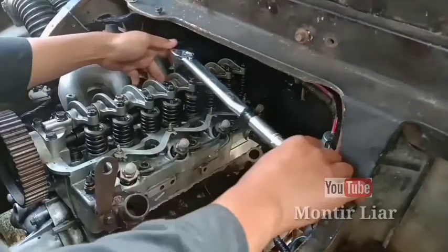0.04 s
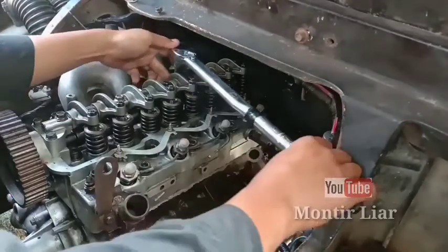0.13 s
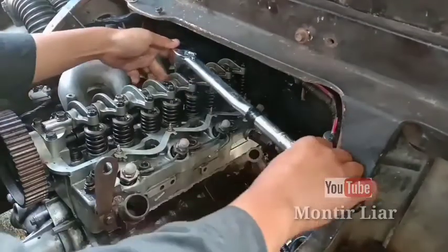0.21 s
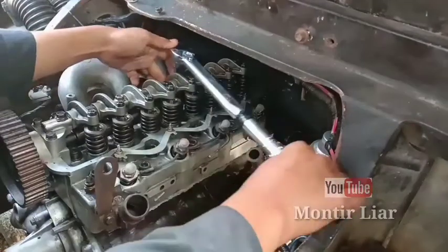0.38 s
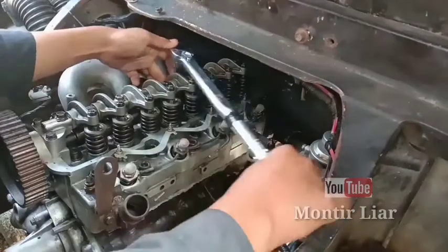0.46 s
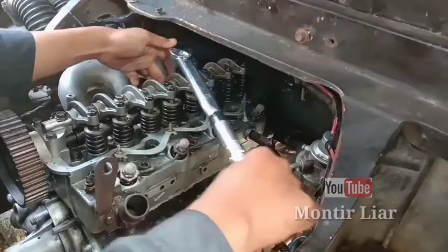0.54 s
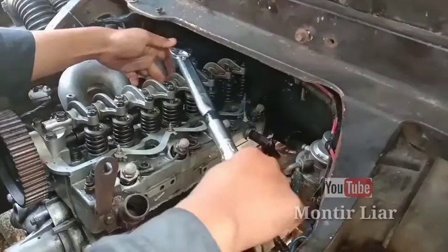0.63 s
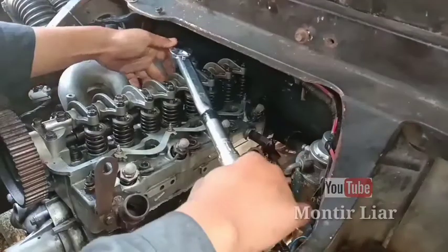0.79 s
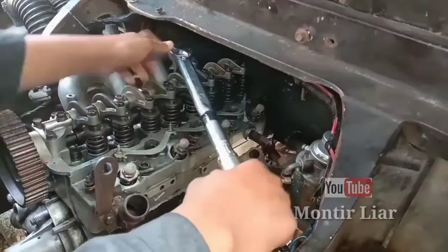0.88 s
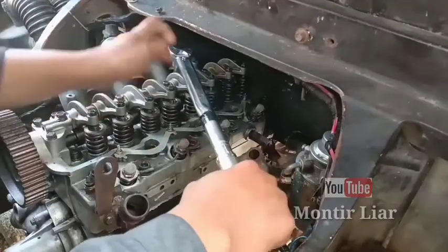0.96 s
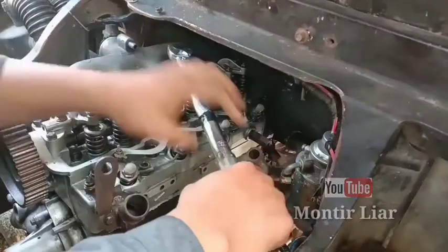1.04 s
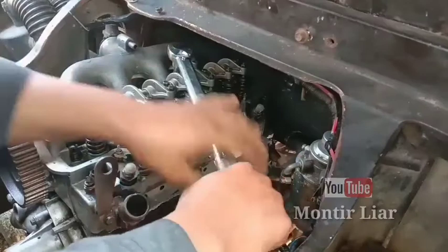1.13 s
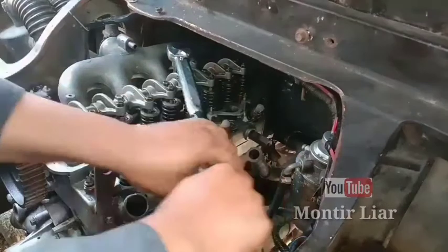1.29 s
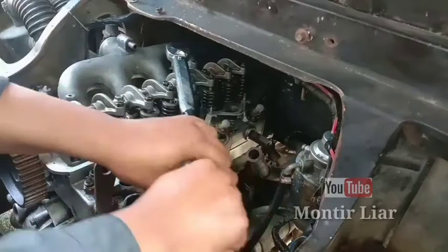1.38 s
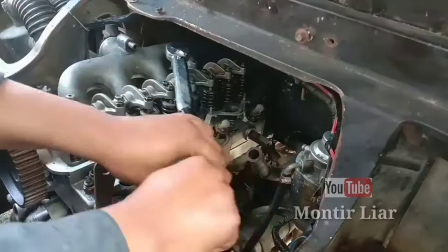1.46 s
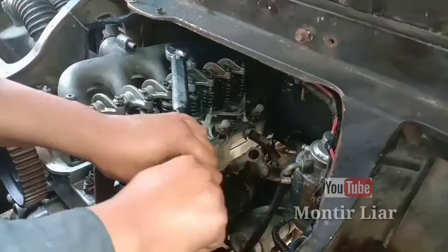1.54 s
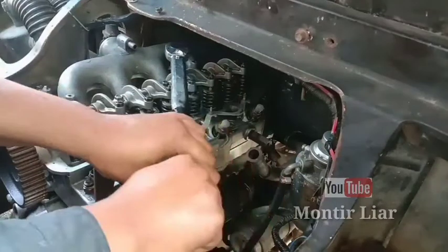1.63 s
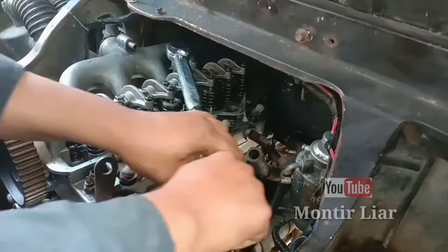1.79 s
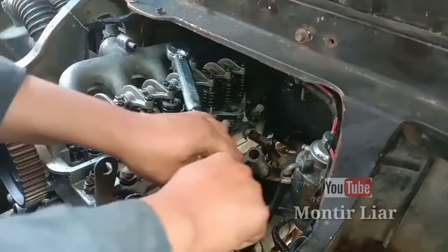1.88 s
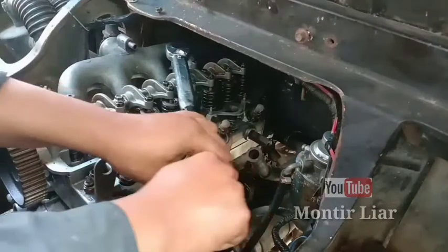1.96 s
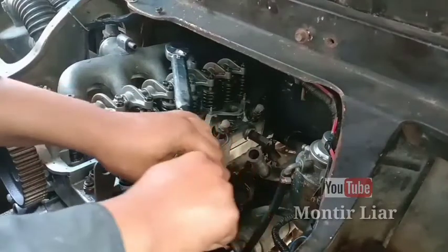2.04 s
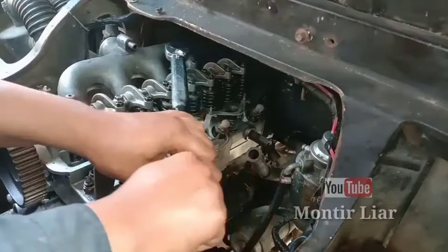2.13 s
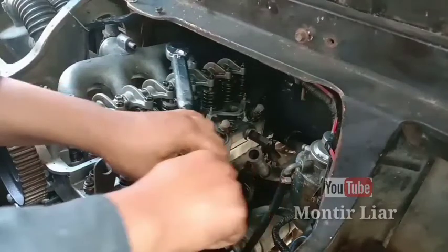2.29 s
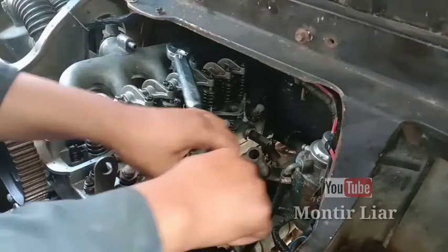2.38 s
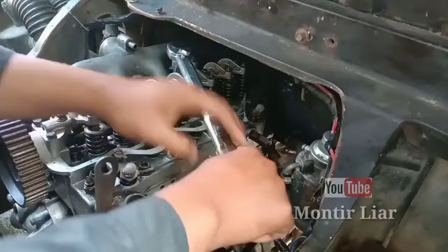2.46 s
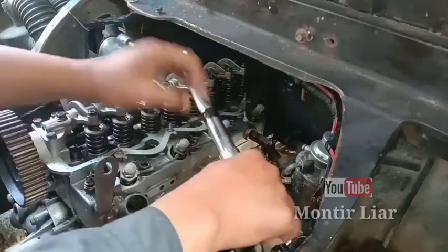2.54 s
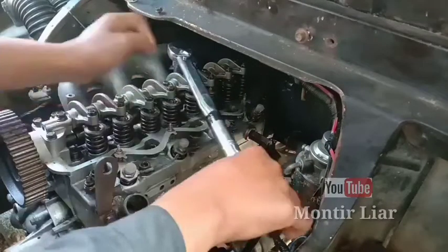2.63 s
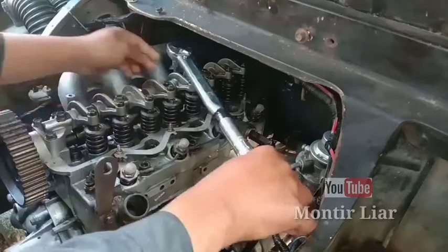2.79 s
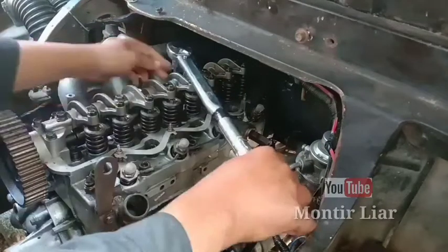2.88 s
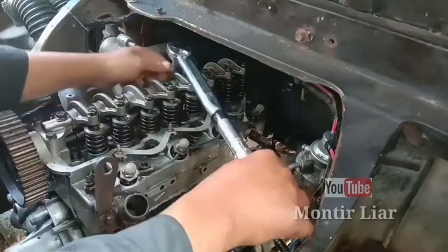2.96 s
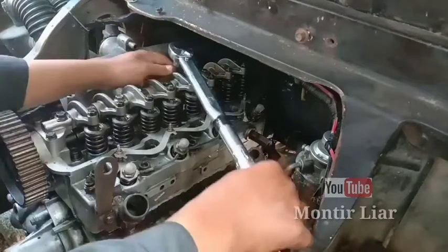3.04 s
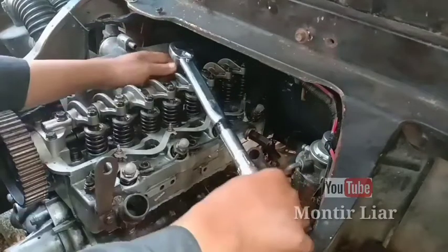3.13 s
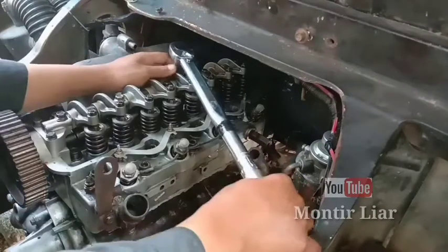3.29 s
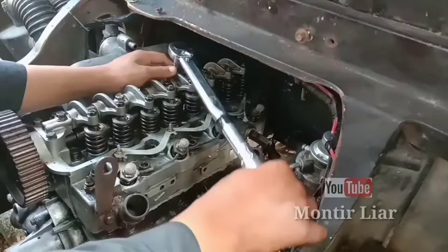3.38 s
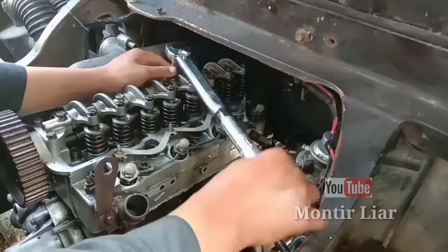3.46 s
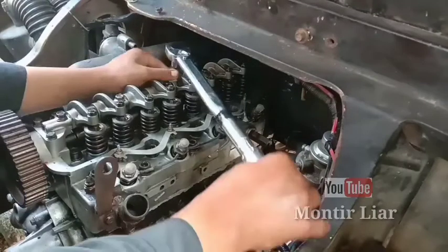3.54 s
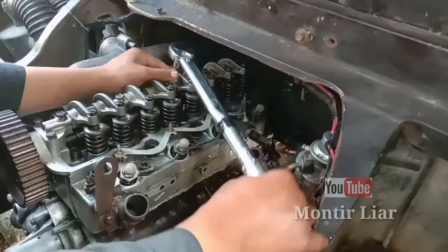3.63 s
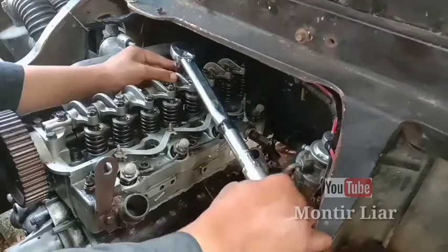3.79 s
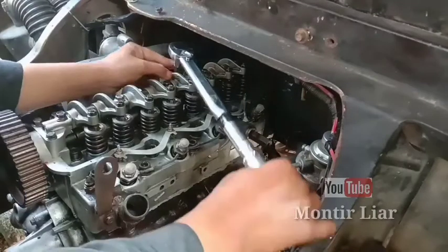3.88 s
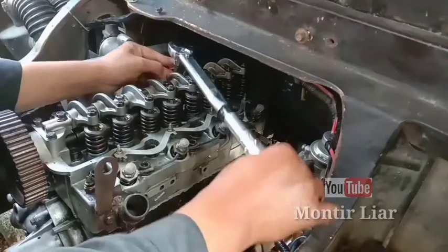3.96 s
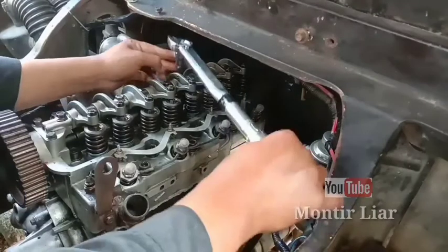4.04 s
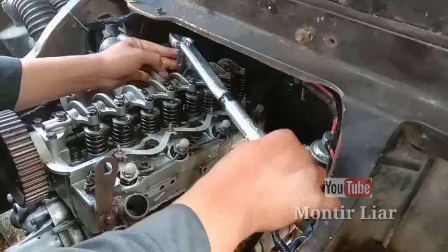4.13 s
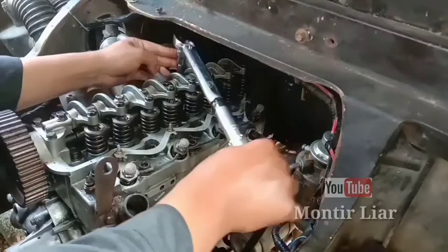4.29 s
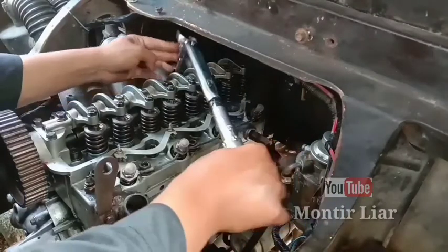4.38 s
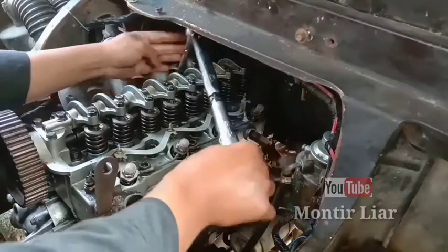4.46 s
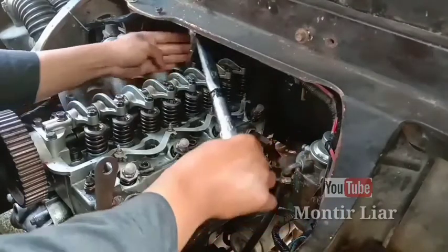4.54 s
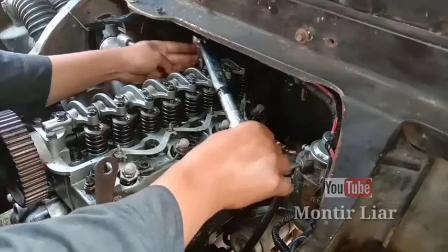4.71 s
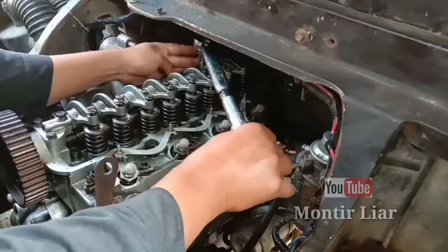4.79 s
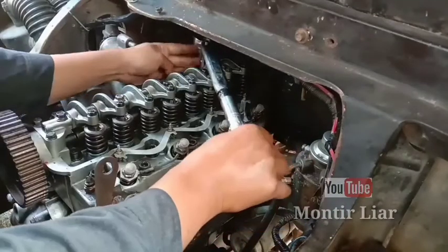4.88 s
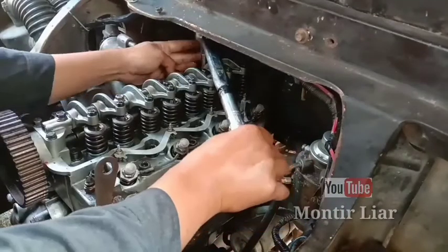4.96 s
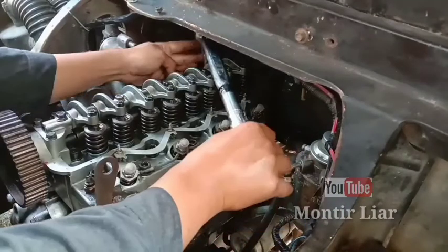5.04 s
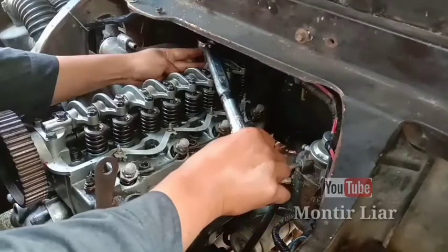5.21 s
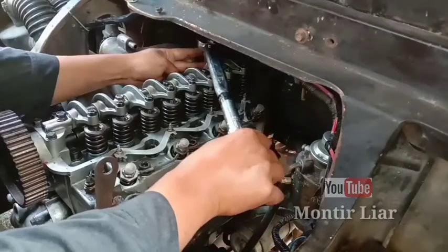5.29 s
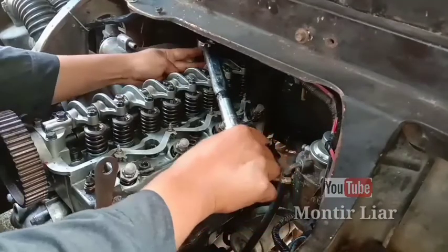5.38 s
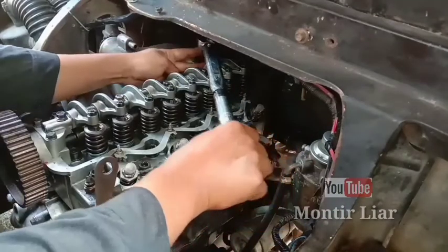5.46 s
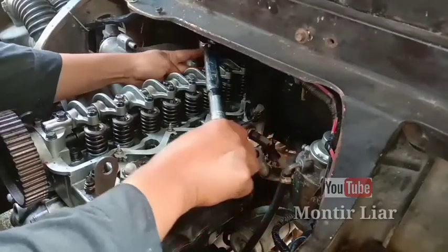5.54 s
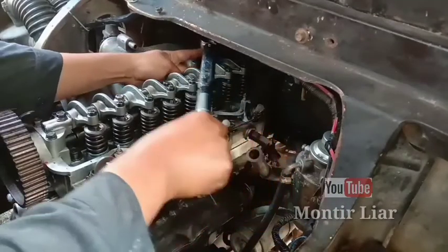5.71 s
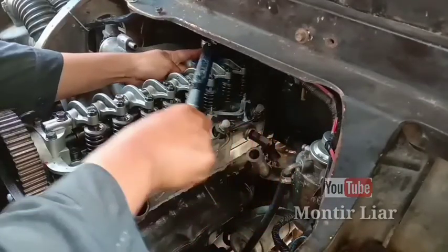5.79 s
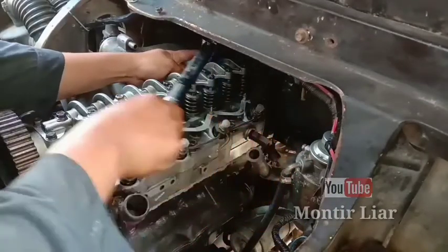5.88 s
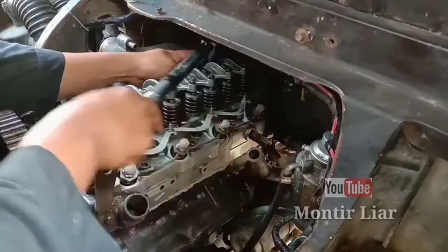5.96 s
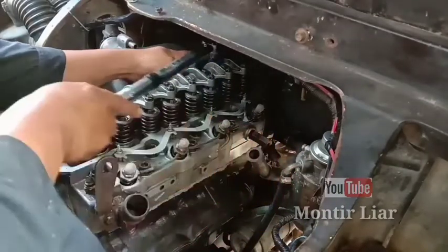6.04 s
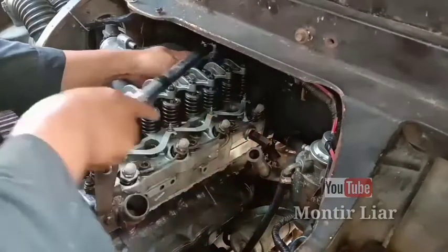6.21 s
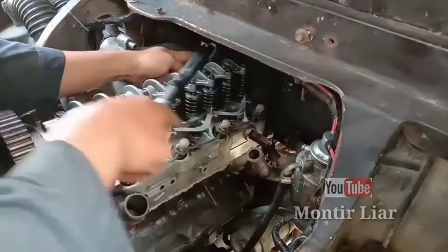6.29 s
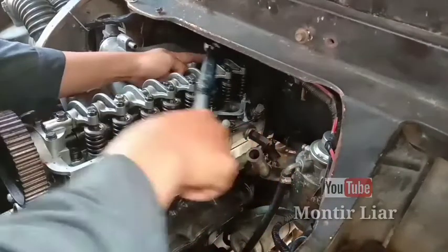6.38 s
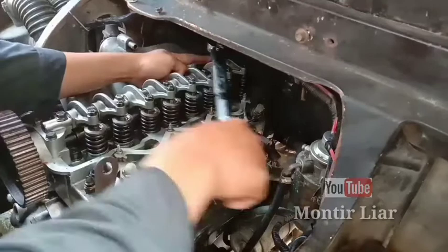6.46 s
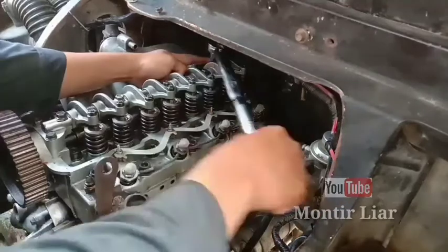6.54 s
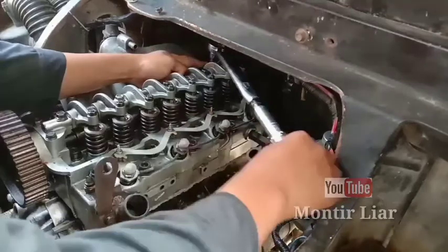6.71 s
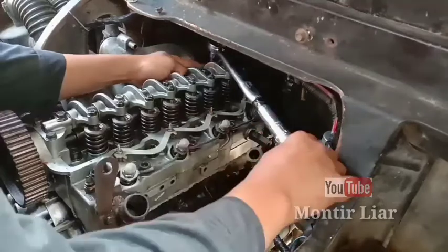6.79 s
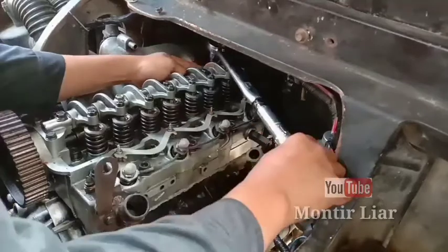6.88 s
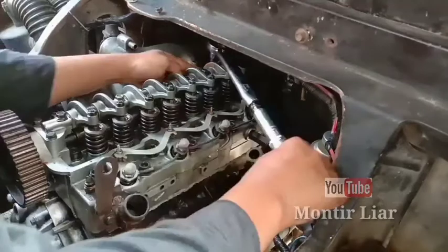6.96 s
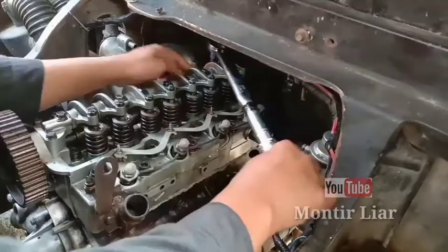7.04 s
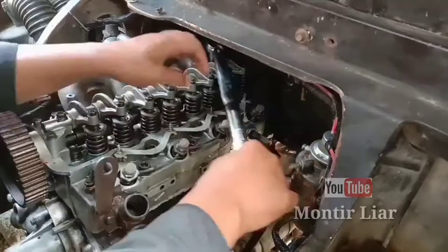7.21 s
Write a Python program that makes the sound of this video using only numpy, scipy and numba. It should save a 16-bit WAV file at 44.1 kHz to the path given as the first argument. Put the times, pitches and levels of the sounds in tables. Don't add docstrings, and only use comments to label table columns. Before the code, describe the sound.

Close, bright metallic cracks from a clicking wrench ring on briefly, followed by scattered hard socket knocks, faint distant birds and a nearing vehicle.

```python
import sys
import numpy as np
from scipy import signal
from scipy.fft import rfft, irfft, next_fast_len
from scipy.io import wavfile
from scipy.ndimage import uniform_filter1d, map_coordinates
from numba import njit

SR = 44100
rng = np.random.default_rng(int(sys.argv[2]) if len(sys.argv) > 2 else 0)


def magnitude_from_level(level_db):
    exponent = np.asarray(level_db, float) / 20
    return 10 ** exponent


def persist_wave(psi):
    counts = np.round(np.clip(psi, -1, 1) * 32767).astype(np.int16)
    wavfile.write(sys.argv[1], SR, np.atleast_2d(counts).T)


N = 318842
M = next_fast_len(N)
T = np.arange(N) / SR


# start_s, peak_db
SNAPS = [
    (1.5669, -10),
    (1.8022, -10),
    (2.1424, -8),
    (2.38, -10),
]
# low_db, bright_db, top_db, t60_s
BREAK_TONE = (-13, -5.5, -18, 0.0451)
RESET_TONE = (-11.5, -5, -13.5, 0.1544)
# start_s, peak_db, low_db, bright_db, top_db, t60_s
FIRST_CRACK = (1.5678, -7, -19, -12, -30, .015)
# start_s, peak_db
SNAP_SPIKES = [(1.5693, -9), (1.5765, -14), (1.8023, -15), (1.8094, -12.5), (2.1444, -10.5)]
# freq_hz, density_db (per Hz)
SNAP_COLOUR = [(350, -33.5), (600, -36.5), (820, -19.5), (1050, -27), (2200, -16), (3300, -14),
               (5800, -11.5), (6600, -14), (7300, -2), (7800, -7.5), (8600, -14), (13000, -28.5),
               (15000, -16.5), (15600, -16.5), (16300, -50)]
# freq_hz, width_hz, level_db
SNAP_PEAKS = [(820, 50, 3), (2130, 120, 3), (2800, 200, -4), (3400, 100, 2), (5060, 51, 0.5),
              (6140, 90, 4.5), (6740, 120, 3), (7230, 150, 4.5), (1050, 73, -4)]
# freq_hz, level_db, t60_s
BREAK_RING = [(1615, -18, 1.4), (2697, -34, 0.33), (3219, -30, 0.28), (3758, -13, 0.45), (3817, -12, 0.54),
              (3876, -26, 0.91), (4161, -12, 0.34), (4226, -13, 0.41), (4398, -10, 0.18), (4716, -10, 0.26),
              (4888, -11, 0.59), (5857, -14, 0.41), (6051, 0, 0.33), (7219, -17, 0.34), (7666, -21, 0.4),
              (15320, -25, 0.2)]
RESET_RING = [(1077, -5, 0.22), (3451, -10, 0.22), (3784, -28, 5.0), (4151, -11, 0.47), (4657, -6, 0.53),
              (4813, -13, 0.69), (4915, -13, 5.0), (5410, -16, 1.1), (5679, -13, 0.75), (5819, -7, 0.23),
              (5997, -1, 0.48), (6083, 0, 0.82), (7817, -14, 0.26), (15320, -6, 0.15)]
LAST_RING = [(1077, -8, 0.38), (1265, -35, 5.0), (3456, -12, 0.44), (3784, -14, 1.9), (3812, -20, .6),
             (4156, -14, 1.0), (4484, -5, 0.29), (4657, -11, 1.8), (4664, -28, 1.0), (4920, -4, 0.6),
             (5410, -12, 0.5), (5469, -14, 0.33), (5685, -1, 0.32), (5873, -12, 0.31), (6002, -20, 0.69),
             (6089, -11, 1.9), (7058, -15, 0.2), (15320, -9, 0.18)]
# level_db, swell_s, pawl_db, damping_s
RINGING = [
    (-31.5, 0.055, -30.5, 0.041),
    (-37, 0.065, -24, 0.014),
    (-30.5, 0.06, -32, 0.02),
    (-35.5, 0.0837, -33, 0.39),
]
# freq_hz, level_db, swell_s
SLOW_SWELL = (3785, -42, .3)


def wrench():
    snaps = [row + (BREAK_TONE, RESET_TONE)[k % 2] for k, row in enumerate(SNAPS)]
    spikes = [row + FIRST_CRACK[2:] for row in SNAP_SPIKES]
    out = blows(snaps + [FIRST_CRACK] + spikes, SNAP_COLOUR, SNAP_PEAKS,
                rattle_s=0.0033, low_longer=0.21, tail_db=-24.5, tail_t60=0.4, high_faster=0.76,
                usual_db=(-12, -4.5, -15), uneven_db=4.0)
    out = band(out, 790, 16200)
    add(out, .121, magnitude_from_level(-47) * out.copy())
    times = [row[0] for row in SNAPS] + [3.15]
    rings = (BREAK_RING, RESET_RING, BREAK_RING, LAST_RING)
    for k, (level_db, swell_s, pawl_db, damp_s) in enumerate(RINGING):
        length_s = times[k + 1] - times[k]
        add(out, times[k], magnitude_from_level(level_db) * modes(rings[k], length_s, swell_s, damp_s, lead_s=.05))
        add(out, times[k], modes([(15310, pawl_db, .15)], .2, 0.0028))
    hz, db, swell_s = SLOW_SWELL
    add(out, times[1], modes([(hz, db, 3.0)], times[2] - times[1], swell_s))
    return out


# start_s, peak_db, low_db, bright_db, top_db
KNOCKS = [(0.023, -38, -7, -28.5, -44), (4.008, -13.5, -22, -8, -23.5), (4.0579, -32.5, -7.5, -17, -43),
          (4.0879, -29.5, -11, -24.5, -53), (4.733, -23, -10, -38, -42.5), (5.1554, -39.5, -9, -19, -39),
          (5.1918, -25.5, -6.5, -15, -26), (5.2762, -33, 9.5, -13, -35), (5.538, -26.5, -12, -15, -37.5),
          (5.552, -18, -14, -11, -23), (5.9872, -12, -13.5, -8, -18.5), (6.0679, -35.5, -12.5, -16, -24),
          (6.4262, -20.5, -22.5, -0.5, -2), (6.6503, -17, -23.5, -5, -8.5), (6.765, -41, -28.5, -21, -50),
          (6.788, -37, -24, -24.5, -36)]
# start_s, peak_db, low_db, bright_db
TOUCHES = [(0.901, -54, -11, -35), (1.2855, -43.5, -3.5, -20), (3.4755, -57, -5, -22),
           (3.6303, -67, -8.5, -3), (4.5536, -60.5, -9, -1), (4.8786, -50, 26, -28),
           (5.293, -48.5, -15, -20), (5.525, -42, 2, -16), (6.345, -52.5, -2.5, -30),
           (7.1059, -49, -6, -7.5), (1.204, -76, 2, -25), (5.981, -43, -11, -11), (6.6455, -31, -18, -15),
           (6.812, -59, -31, 12), (5.301, -57, -2, -19),
           (7.171, -40, -31, -15), (7.1921, -38.5, 1, 15), (3.995, -31, -27, -22.5), (4.002, -32, 0, -17),
         (6.418, -30, -25, -18), (7.139, -41.5, -22, 12)]
# start_s, peak_db, low_db, bright_db
CRACKS = [(4.0155, -15, -20, -9.5), (4.025, -20, -20, -9), (4.089, -31, -17, -16), (4.7384, -21, -10, -17),
          (5.191, -26, -12, -14), (5.197, -28, -12, -12), (5.203, -32, -17, -10), (5.2772, -36.5, -7, -14),
          (5.5412, -28, -16, -18), (5.5522, -15, -22, -9), (5.5545, -12.5, -20, -10),
          (5.5585, -15, -26, -13), (5.991, -14, -21, -10), (5.997, -14.5, -20, -7),
          (6.4292, -15.5, -25.5, -3), (6.6526, -13, -16, -3)]
# start_s, peak_db, low_db, bright_db, top_db, t60_s
SEATING_CRACK = (4.0085, -12, -40, 0, -32, .014)
# freq_hz, density_db (per Hz)
KNOCK_COLOUR = [(350, -27.5), (600, -9), (1000, -9), (1280, 1), (2000, -4.5), (3000, 0), (4300, 1.5),
                (6200, 1), (6700, -3.5), (7400, -1), (12500, -26), (14900, -27), (15600, -21), (16300, -62)]
# freq_hz, width_hz, level_db
KNOCK_PEAKS = [(1263, 66, 8), (1637, 49, 3.5), (2190, 98, 5), (2850, 135, 5), (4316, 120, 4),
               (4957, 98, 3.5), (6200, 270, 6), (7010, 90, -1), (7500, 180, 5), (3400, 310, -2.5),
               (10590, 130, 10)]
# start_s, peak_db
JINGLES = [(7.1404, -31), (7.1924, -31)]
# freq_hz, level_db, t60_s
JINGLE_MODES = [(3600, -20, 0.19), (4320, -14.5, 0.18), (7240, -16, 0.03), (10300, -14.5, 0.039),
                (13400, -18, .05), (15000, -9, 0.027)]
# start_s, peak_db
THUDS = [(1.295, -25), (1.311, -27.5)]
# freq_hz, level_db, t60_s
THUD_MODES = [(141.4, 4, 0.2), (306, -1, 0.047), (433, -3, 0.03), (610, 9, 0.033), (757, 0.5, 0.14),
              (970, 3, 0.026)]


def socket():
    faint_top_db = -11.5
    firm = [row + (0.089 + .0011 * row[2],) for row in KNOCKS]
    faint = [row + (row[3] + faint_top_db, 0.11) for row in TOUCHES]
    cracks = [(s, db - 5, low, bright, bright + faint_top_db, .016) for s, db, low, bright in CRACKS]
    usual_db = (-9, -15, -33)
    out = blows(firm + faint + [SEATING_CRACK], KNOCK_COLOUR, KNOCK_PEAKS,
                rattle_s=.004, low_longer=0.35, tail_db=-26.0, tail_t60=0.28, high_faster=0.602,
                usual_db=usual_db, uneven_db=5.0)
    out = band(out, 820, 17000)
    hard = blows(cracks, KNOCK_COLOUR, KNOCK_PEAKS,
                 rattle_s=.002, low_longer=0.27, tail_db=-30, tail_t60=.2, high_faster=.6,
                 usual_db=usual_db, uneven_db=2.0)
    out += band(hard, 1100, 14000)
    jingle = [(hz, db, min(t60, .15)) for hz, db, t60 in JINGLE_MODES]
    for s, db in JINGLES:
        add(out, s, magnitude_from_level(db - 3.5) * modes(jingle, .1, .001))
    for s, db in THUDS:
        add(out, s, magnitude_from_level(db - 13) * modes(THUD_MODES, 0.15, 0.004))
    return out


# start_s, length_s, low_hz, high_hz, level_db (rms)
RUBS = [(.465, 0.42, 3100, 5700, -58), (.47, 0.38, 4900, 8200, -63), (4.52, 0.16, 3200, 7700, -70),
        (6.43, 0.45, 3300, 6500, -68), (6.97, 0.234, 2770, 7000, -74), (4.03, .11, 900, 5800, -50),
        (1.0, .55, 3800, 6200, -74.5), (5.2, 0.14, 900, 1400, -62), (4.77, 0.065, 300, 1000, -60),
        (1.82, .15, 340, 616, -61), (2.39, .17, 330, 600, -60), (6.76, 0.06, 1900, 5600, -62),
        (1.6, .2, 7100, 7800, -55), (1.59, .15, 3100, 5800, -54), (2.17, .14, 3100, 5800, -56),
        (2.42, .2, 3300, 6300, -60), (4.5, .2, 6800, 7800, -72), (4.92, .08, 6900, 7800, -74),
        (1.68, .025, 7100, 7900, -56), (2.18, .2, 7100, 7800, -57), (1.92, .03, 8500, 13500, -74),
        (2.43, .2, 7100, 7800, -59), (4.24, .2, 650, 1050, -68), (6.68, .17, 330, 700, -63),
        (4.545, .07, 4100, 4700, -70), (2.15, .08, 330, 600, -62), (1.57, .05, 200, 420, -61),
        (6.65, .04, 1750, 2500, -54), (0.024, .05, 900, 1400, -61), (.6, .25, 3800, 5200, -63)]
# start_s, length_s, level_db (rms)
BOOMS = [(1.3, .1, -53), (2.85, .07, -47), (3.05, .07, -50), (3.37, .07, -51), (3.85, .08, -47),
         (5.6, .12, -50), (6.83, .06, -47), (7.05, .07, -46)]


def rubbing():
    out = np.zeros(N)
    booms = [(s, length_s, 70, 165, db) for s, length_s, db in BOOMS]
    for s, length_s, low_hz, high_hz, db in RUBS + booms:
        count = round(length_s * SR)
        u = np.arange(count) / count
        streaks = magnitude_from_level(5.7 * drift(130, count=SR // 2 + 1))
        grains = irfft(rfft(rng.standard_normal(SR)) * streaks)[:count]
        grains *= magnitude_from_level(1.67 * drift(90, count=count))
        add(out, s, magnitude_from_level(db + 3.0) * np.sin(np.pi * u ** 0.38) * rms_one(band(grains, low_hz, high_hz)))
    return out


# start_s, pitch_hz, level_db (rms)
CROW = [
    [(.195, 2800, -55), (.21, 2855, -57.5), (.255, 2850, -60.5), (.295, 3120, -58), (.37, 3160, -47.5),
     (.49, 3120, -67)],
    [(.595, 2816, -46.5), (.64, 2850, -73), (.7, 3090, -53.5), (.86, 3090, -64), (1.0, 2920, -72),
     (1.13, 2950, -87)],
    [(.86, 2800, -70), (.915, 2850, -50), (1.05, 2850, -69), (1.11, 2850, -56.5), (1.22, 2770, -62),
     (1.27, 2730, -68), (1.32, 2690, -60), (1.42, 2600, -68), (1.54, 2460, -72.5)],
]
# start_s, length_s, pitch_hz, level_db (rms)
SQUAWK = [(.439, 0.04, 5630, -48.5), (0.44, 0.035, 7760, -51), (0.47, 0.027, 4350, -51),
          (0.484, 0.053, 6200, -50.5), (0.504, 0.023, 3390, -45.5), (0.518, 0.062, 4270, -46),
          (.515, .05, 8300, -67), (0.53, 0.047, 4060, -44), (0.576, 0.021, 3440, -61),
          (0.58, 0.042, 3900, -42.5), (.612, 0.11, 4030, -57), (0.62, 0.02, 4996, -41.5),
          (0.644, 0.012, 4970, -54), (.6, 0.013, 5600, -52), (0.71, 0.086, 4350, -58)]
# start_s, pitch_hz, level_db (rms)
CHIPS = [(0.758, 7630, -54), (0.979, 7800, -57.5), (1.307, 7850, -54), (1.505, 7740, -54),
         (2.089, 7650, -53.5), (3.465, 7370, -59.5), (3.661, 7500, -56), (4.12, 7610, -63.5),
         (4.356, 7620, -62.5)]
# start_s, length_s, pitch_hz, level_db (rms)
TWITTER = [(.88, 0.11, 7150, -71), (1.012, .12, 8300, -73), (1.015, .072, 8800, -77),
           (2.718, 0.13, 6900, -69), (2.896, 0.074, 7500, -62.5), (2.949, 0.045, 9320, -69),
           (2.985, .17, 7800, -69), (2.995, 0.042, 8600, -67.5), (3.055, 0.087, 9200, -74),
           (3.14, 0.049, 7260, -69.5), (3.194, 0.035, 7930, -66)]
# start_s, length_s, pitch_hz, level_db (rms), roughness (0-1)
DRONES = [(1.033, 0.99, 5950, -71, 0.26), (1.383, 0.22, 4940, -73, 0.5), (2.458, 0.91, 1703, -77.5, 0.15),
          (2.719, 0.069, 1247, -58, 0.21), (2.902, 0.39, 4883, -78.5, 0.04), (3.009, 0.1, 1202, -58, 0.2),
          (6.808, 0.025, 12820, -65, 0.25), (.25, 0.13, 2830, -73, 0), (.63, .19, 2814, -63, 0.1),
          (4.267, 0.14, 1264, -60.5, 0.1), (4.627, 0.031, 1284, -65, 0), (5.3, 0.096, 1265, -61, 0.16),
          (6.901, 0.14, 1252, -61, .15), (6.327, 0.057, 1265, -62.5, 0), (6.809, 0.16, 796, -65.5, 0.13),
          (7.03, 0.14, 810, -62.5, 0.12), (7.151, 0.035, 1104, -62, 0.25), (1.61, .025, 12900, -58, .1),
          (2.09, .05, 1620, -60.5, 0.3), (7.166, 0.067, 1602, -60.5, 0.23), (4.133, 0.029, 1285, -61, .15)]
# start_s, length_s, pitch_hz, level_db (rms), roughness (0-1)
INSECT = [(3.58, .2, 5940, -73.5, .2), (3.782, .22, 6050, -69.5, .35), (4.22, .11, 6000, -74, 0.27),
          (4.36, 0.095, 5960, -72, 0.18), (4.626, 0.2, 5940, -72, 0.22), (4.802, 0.46, 6040, -69.5, .35),
          (5.383, .07, 5900, -75.5, .2)]


def birds():
    out = np.zeros(N)
    for syllable in CROW:
        s, hz, db = np.transpose(syllable)
        t = np.arange(s[0], s[-1], 1 / SR)
        edges = np.clip(np.minimum(t - s[0], s[-1] - t) / 0.013, 0, 1)
        level = edges * magnitude_from_level(np.interp(t, s, db) + 3.5 * drift(18, count=len(t)))
        rough = 0.18 + .2 * (t - s[0])
        add(out, s[0], whistle(np.interp(t, s, hz), level, rough))
    for s, length_s, hz, db in SQUAWK:
        rise = 0.045 * np.exp(-(s - SQUAWK[0][0]) / 0.039)
        add(out, s, note(length_s, hz, db, rise, 0.4))
    for s, hz, db in CHIPS:
        add(out, s, note(0.028, hz, db, 0, 0.47))
    for s, length_s, hz, db in TWITTER:
        peak_s = 3.03 if s > 2 else 1.12
        glide = 2.2 * length_s * (peak_s - s - length_s / 2)
        add(out, s, note(length_s, hz, db, glide, .1))
    for s, length_s, hz, db, rough in DRONES + INSECT:
        tone = note(length_s, hz, db, 0, rough)
        if abs(hz - 6000) < 100:
            count = len(tone)
            tone *= 1 + .85 * np.sin(2 * np.pi * 16 * np.arange(count) / SR + drift(3.0, count=count))
        add(out, s, tone)
    t = np.arange(SR // 2) / SR
    yard = rng.standard_normal(len(t)) * magnitude_from_level(-60 * t / 0.47) * (t > .012)
    echo = band(yard / np.linalg.norm(yard), 500, 9000)
    return out + magnitude_from_level(-7) * signal.fftconvolve(out, echo)[:N]


# start_s, level_db
ENGINE = [(2.9, -66.5), (4.1, -57.5), (5.5, -58.5), (6.05, -49), (6.4, -51.5), (6.65, -47.5), (6.85, -49),
          (7.05, -46.5), (7.23, -44.5)]
# multiple (of the turning rate), level_db
ENGINE_ORDERS = [(1, -36), (2, -11), (3, -8), (4, -5), (5, 4.5), (6, -4.5), (7, -18), (8, -22), (9, -13.5),
                 (10, -16.5), (13, -22), (14, -26)]


def engine():
    s, db = np.transpose(ENGINE)
    fifth_hz = 221.4 - 16.4 * np.maximum(T - 7.0, 0)
    turn = 2 * np.pi * np.cumsum(fifth_hz / 5) / SR
    level = magnitude_from_level(np.interp(T, s, db) - 2.5) * np.clip((T - s[0]) / 0.29, 0, 1)
    return level * sum(magnitude_from_level(order_db + 4.0 * drift(7.0)) * np.sin(k * turn + 1.21 * drift(12.0))
                       for k, order_db in ENGINE_ORDERS)


# start_s, level_db
TRAFFIC = [(0, -46), (.4, -48), (.8, -53), (2.3, -52), (2.8, -51), (3.2, -57), (3.9, -46.5), (4.5, -55),
           (5.9, -49.5), (6.55, -57.5), (7.0, -49), (7.23, -47.5)]
# freq_hz, density_db (per Hz)
RUMBLE = [(20, -37), (80, -1), (102, 2), (143, 1.5), (179, -12), (222, -10.5), (248, -21.5), (344, -26),
          (520, -50.5)]
MID = [(160, -36), (280, 1), (334, -22), (402, -5.5), (476, -10), (783, -12), (1080, -16.5), (1255, -5),
       (1460, -19), (2100, -23), (2730, -47.5)]
HISS = [(1800, -16), (2500, -11), (5900, -12), (6550, -21.5), (7000, -11), (7500, -11.5), (8200, -22),
        (9500, -23), (13000, -27), (14800, -20), (15500, -19.5), (15800, -45)]


def background():
    nearness = magnitude_from_level(np.interp(T, *np.transpose(ENGINE)) + 46) * (T > ENGINE[0][0])
    road_db = np.interp(T, *np.transpose(TRAFFIC)) + 2.3 * drift(7.0)
    rumble = magnitude_from_level(road_db) * patchy_noise(RUMBLE, patchy_db=3.0, rate=5.0)
    hum = magnitude_from_level(-68 + 5.5 * nearness) * patchy_noise(MID, patchy_db=2.5, rate=8.0)
    hiss = magnitude_from_level(-74 + 1.0 * drift(1.7)) * patchy_noise(HISS, patchy_db=1.7, rate=6.0)
    return rumble + hum + hiss


def blows(table, colour, peaks, rattle_s, low_longer, tail_db, tail_t60, high_faster, usual_db, uneven_db):
    out, t = np.zeros(N), np.arange(15000) / SR
    hz = (400 + 16000 * np.linspace(0, 1, 220) ** 1.5) * np.exp(rng.normal(0, .004, 220))
    base = at_hz(colour, hz) + 10 * np.log10(np.gradient(np.sort(hz)) + 30)
    base += sum(db * np.exp(-((hz - peak_hz) / width_hz) ** 2) for peak_hz, width_hz, db in peaks)
    bins = np.fft.rfftfreq(len(t), 1 / SR)
    for s, peak_db, low_db, bright_db, top_db, t60 in table:
        bright = bright_db - usual_db[1]
        tilt = [(1300, low_db - usual_db[0]), (4000, 0), (7800, bright), (12000, bright),
                (14500, top_db - usual_db[2])]
        uneven = rng.normal(0, uneven_db, 220)
        strength = magnitude_from_level(base + at_hz(tilt, hz) + uneven - uniform_filter1d(uneven, size=9))
        start = rng.exponential(rattle_s * min(1, t60 / 0.065), 220)
        loss_db = 60 / (t60 * (4000 / hz) ** low_longer) / SR
        ring = strike(strength, (start * SR).astype(int), magnitude_from_level(-loss_db), 2 * np.pi * hz / SR, count=4500)
        ring *= magnitude_from_level(1.0 * drift(200, count=4500))
        shape = magnitude_from_level(at_hz(colour, bins) + at_hz(tilt, bins))
        noise = rfft(rms_one(irfft(rfft(rng.standard_normal(len(t))) * shape, len(t))))
        high = irfft(noise * (bins > 8300), len(t))
        low = irfft(noise, len(t)) - high
        tail = low * magnitude_from_level(-60 * t / tail_t60) + high * magnitude_from_level(-60 * t / tail_t60 / high_faster)
        tail *= magnitude_from_level(tail_db + 1.1 * drift(7.6, count=len(t))) * (1 - np.exp(-t / 0.0033))
        add(out, s - .0006, magnitude_from_level(peak_db) * ring / np.abs(ring).max())
        add(out, s, magnitude_from_level(peak_db) * min(1, t60 / 0.12) ** 2 * tail)
    return band(band(out, 520, 16200), 640, 16300)


@njit
def strike(strength, first, pole_r, turn, count):
    out = np.zeros(count)
    for k in range(len(strength)):
        a, b = 2 * pole_r[k] * np.cos(turn[k]), pole_r[k] ** 2
        now, before = strength[k] * np.sin(turn[k]), 0.0
        for i in range(first[k], count):
            out[i] += before
            now, before = a * now - b * before, now
    return out


def modes(table, length_s, swell_s, damp_s=.02, lead_s=0):
    t = np.arange(round(length_s * SR)) / SR
    x = np.zeros(len(t))
    for hz, db, t60 in table:
        level = magnitude_from_level(db - 60 * (t - lead_s) / t60 + 2.1 * drift(38, count=len(t)))
        x += level * np.sin(2 * np.pi * (hz * t + rng.random()))
    return x * (1 - np.exp(-(t / swell_s) ** 2)) * np.clip((length_s - t) / damp_s, 0, 1)


def whistle(pitch, level, rough):
    count = len(pitch)
    wobble = 250.0 * rough * drift(300, count=count)
    flutter = 1 + rough * drift(60, count=count)
    return level * flutter * np.sin(2 * np.pi * np.cumsum(pitch + wobble) / SR)


def note(length_s, hz, db, glide, rough):
    u = np.arange(round(length_s * SR)) / round(length_s * SR)
    shape = np.minimum(1, u * length_s / 0.0027) * np.sin(np.pi * (.1 + .9 * u)) ** .5
    return whistle(hz * (1 + glide * np.sin(np.pi * u / 2)), magnitude_from_level(db - 1.0) * shape, rough)


def patchy_noise(spectrum, patchy_db, rate):
    hz = np.fft.rfftfreq(M, 1 / SR)
    inside = (hz > spectrum[0][0]) * (hz < spectrum[-1][0])
    shaped = rfft(rng.standard_normal(M)) * magnitude_from_level(at_hz(spectrum, hz)) * inside
    slices = np.floor(np.log2(hz + 1) * 2)
    kept = np.unique(slices[np.abs(shaped) > 0])
    return rms_one(sum(magnitude_from_level(patchy_db * drift(rate)) * irfft(shaped * (slices == k), M)[:N] for k in kept))


def drift(rate, count=N):
    knots = rng.standard_normal(2000)[:int(count / SR * 2 * rate) + 3]
    coarse = np.arange(0, count + 8, 8)
    smooth = map_coordinates(knots, [coarse * 2 * rate / SR], order=3, mode="nearest")
    return np.interp(np.arange(count), coarse, smooth)


def band(x, low_hz, high_hz):
    return signal.sosfilt(signal.butter(3, [low_hz, high_hz], "band", fs=SR, output="sos"), x)


def at_hz(points, hz):
    p = np.array(points, float)
    return np.interp(np.log(np.maximum(hz, 1)), np.log(p[:, 0]), p[:, 1])


def rms_one(x):
    return x / np.sqrt(np.mean(x ** 2) + 1e-20)


def add(out, s, x):
    i = round(s * SR)
    out[i:i + len(x)] += x[:N - i]


# freq_hz, level_db
SIDE_DB = [(230, -60), (420, -18.5), (5600, -10.5), (14000, -7)]


def scene():
    air = background()
    mid = wrench() + socket() + rubbing() + birds() + engine() + air
    other_air = air[::-1]
    side = irfft(rfft(other_air, M) * magnitude_from_level(at_hz(SIDE_DB, np.fft.rfftfreq(M, 1 / SR))), M)[:N]
    side *= magnitude_from_level(3.0 * drift(9.0))
    side += magnitude_from_level(-16.5) * np.clip(3 * drift(6.0) - 1.5, 0, 1) * band(other_air, 25, 200)
    flicker = drift(150.0, count=4000)[np.arange(N) % 4000]
    side += magnitude_from_level(-29) * band(band(mid, 1500, 3500) * flicker, 1200, 4000)
    return np.array([mid + side, mid - side])


def roll_off(x):
    return signal.sosfilt(signal.butter(12, 16760, fs=SR, output="sos"), x)


def record(dry):
    overload = 1.3
    mix = overload * np.tanh(dry / overload)
    return roll_off(mix)


dry = scene()
out = record(dry)
persist_wave(out)
```